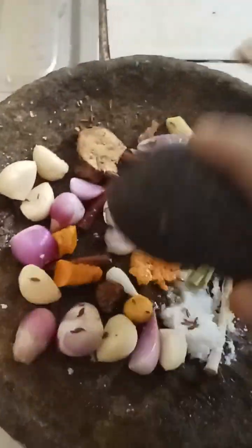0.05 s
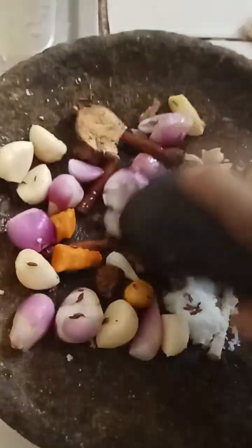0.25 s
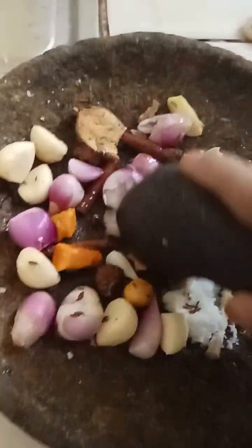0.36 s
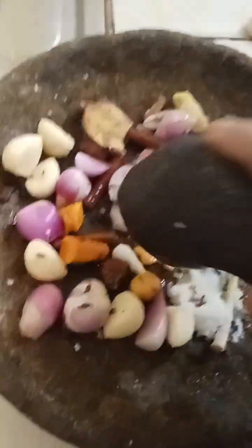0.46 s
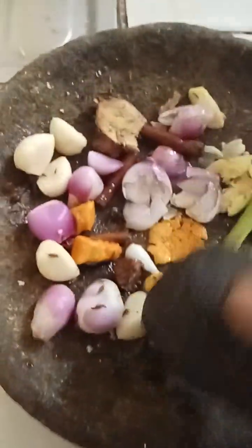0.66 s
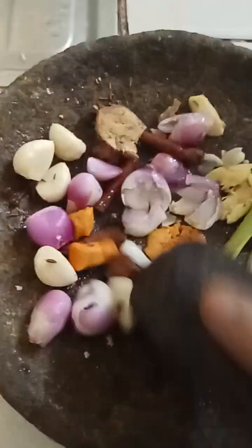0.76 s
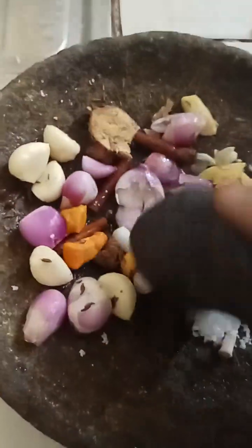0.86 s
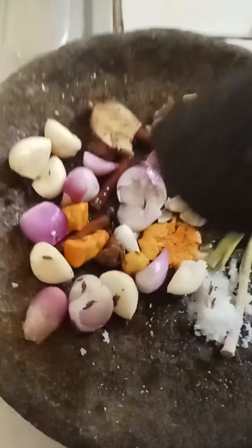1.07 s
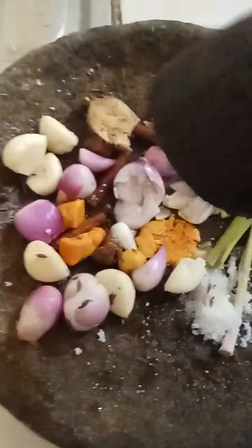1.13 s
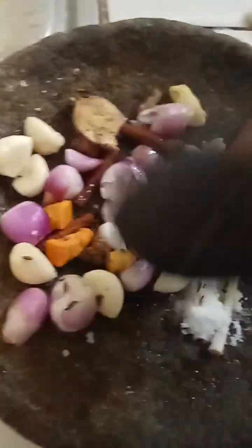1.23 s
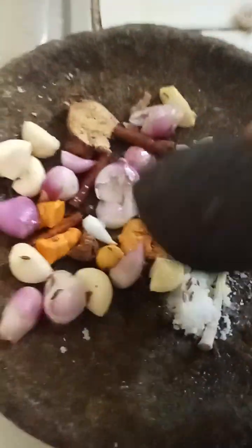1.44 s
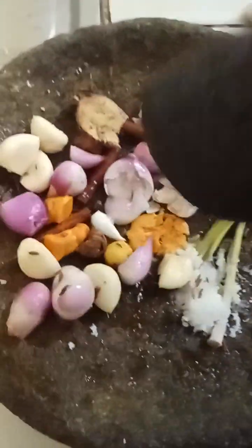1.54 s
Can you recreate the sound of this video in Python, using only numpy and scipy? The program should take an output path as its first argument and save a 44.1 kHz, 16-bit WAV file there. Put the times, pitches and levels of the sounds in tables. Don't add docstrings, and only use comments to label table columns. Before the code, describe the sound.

Stone pestle thudding in a heavy mortar, splitting shallots and spices with sharp cracks and light bounces

```python
import sys
import numpy as np
from scipy import signal
from scipy.io import wavfile
from scipy.ndimage import uniform_filter1d

SR = 44100
rng = np.random.default_rng(int(sys.argv[2]) if len(sys.argv) > 2 else 0)


def volts_from_db(level):
    exponent = np.asarray(level, float) / 20
    return 10 ** exponent


def to_wav(s):
    ch = np.atleast_2d(s).T
    pcm = np.round(np.clip(ch, -1, 1) * 32767)
    wavfile.write(sys.argv[1], SR, pcm.astype(np.int16))


N = 70560
LEAD_S = 0.4
M = N + round(LEAD_S * SR)

# pitch_hz [Hz], level_db [dB]
SNAP_COLOUR = [(300, -40), (1200, -8.5), (1650, -14.5), (2300, 6), (3700, 1.5), (6000, -9.5), (10000, -12),
               (16000, -11)]


def evened(x):
    return x / np.sqrt(np.mean(x ** 2) + 1e-20)


def read(points, hz):
    point_hz, value = np.transpose(points)
    return np.interp(np.log(hz + 1), np.log(point_hz + 1), value)


def add(mix, start_s, sound):
    part = mix[round((start_s + LEAD_S) * SR):][:len(sound)]
    part += sound[:len(part)]


def colour(x, points, tilt_db=0):
    hz = np.abs(np.fft.fftfreq(8192, 1 / SR))
    tilt = tilt_db * np.log2((hz + 1) / 3000)
    log_gain = np.log(volts_from_db(read(points, hz) + tilt))
    response = np.exp(log_gain - 1j * signal.hilbert(log_gain).imag)
    taps = np.fft.ifft(response).real[:4096] * np.hanning(8192)[4096:]
    return signal.fftconvolve(x, taps)[:len(x)]


def ring(hz, db, t60, t):
    return volts_from_db(db - 60 * t / t60) * np.sin(2 * np.pi * hz * t)


def send(body, t):
    return body * np.exp(-t / 0.012)


def air():
    # pitch_hz [Hz], level_db [dB per Hz]
    air_colour = [(40, -52), (100, -15), (300, -1), (800, -4), (2500, -13), (4500, -21), (9000, -29),
                  (16000, -39)]
    drift = evened(uniform_filter1d(rng.standard_normal(M), 3000))
    return volts_from_db(-60 + 1.4 * drift) * evened(colour(rng.standard_normal(M), air_colour))


def blows():
    # start_s [s], ring_db [dB], thump_db [dB], sway_db [dB]
    blow_list = [
        (-.17, -3.5, -23, -32.5),
        (0.2221, -3.5, -12, -35.5),
        (0.653, -50.5, -39, -65.5),
        (0.704, -30, -22.5, -67.5),
        (0.774, -21.5, -23.5, -50.5),
        (1.234, -20.5, -15.5, -37.5),
    ]
    # pitch_hz [Hz], level_db [dB], t60_s [s]
    counter_modes = [(163.9, -6.5, 0.45), (219.1, -9.5, 0.5), (227, -5.5, 0.31), (267.7, -3, 0.41),
                     (250, 1.5, 0.035), (350, 0, 0.037), (470.5, -3.5, 0.13), (488, -4, 0.17),
                     (672, -7.5, 0.034), (763, -11.5, 0.095), (922, -3.5, 0.023), (1085.5, -9, 0.059),
                     (1270, -13, 0.12), (2300, -10, .015)]
    thump_hz, thump_sag, thump_t60, thump_rise_s = 95.4, 0.48, 0.08, 0.008
    sway_hz, sway_from_s, sway_for_s, sway_fade_db = 56.7, 0.087, 0.31, -26
    pulp_hz, pulp_db, pulp_t60 = 573, -7.5, 0.032

    out, wet, t = np.zeros(M), np.zeros(M), np.arange(SR) / SR
    body = sum(ring(*mode, t) * (-1) ** k for k, mode in enumerate(counter_modes)) / 3
    bent_t = t * (1 - thump_sag) + thump_sag * 0.034 * (1 - np.exp(-t / 0.023))
    thump_tone = np.sin(2 * np.pi * thump_hz * bent_t) * (1 - np.exp(-t / thump_rise_s))
    u = np.clip((t - sway_from_s) / sway_for_s, 0, 1)
    sway_tone = np.sin(np.pi * u) ** 0.51 * np.sin(2 * np.pi * sway_hz * t)
    for start_s, ring_db, thump_db, sway_db in blow_list:
        counter = volts_from_db(ring_db) * body
        thump = volts_from_db(thump_db - 60 * t / thump_t60) * thump_tone
        sway = volts_from_db(sway_db + sway_fade_db * u) * sway_tone
        pulp = ring(pulp_hz, thump_db + pulp_db, pulp_t60, t)
        add(out, start_s, counter + thump + sway + pulp)
        add(wet, start_s, send(counter, t))
    return out, wet


def kitchen(x):
    # pitch_hz [Hz], t60_s [s]
    kitchen_t60 = [(60, 0.37), (200, 0.67), (500, .55), (1200, 0.36), (3000, 0.43), (8000, 0.27),
                   (16000, 0.21)]
    echoes = np.zeros(SR)
    at = np.arange(200, SR - 20, 20)
    echoes[at + rng.integers(0, 20, len(at))] = rng.choice([-1., 1.], len(at))
    hz, t, bands = signal.stft(echoes, SR, nperseg=512)
    fade = volts_from_db(-60 * t / read(kitchen_t60, hz)[:, None])
    tail = signal.istft(bands * fade, SR, nperseg=512)[1]
    return signal.fftconvolve(x, tail / np.linalg.norm(tail))[:M]


def cracks():
    # start_s [s], length_s [s], level_db [dB], snap_rate [snaps per s], tilt_db [dB per octave]
    crack_list = [(-.12, .002, -1, 9000, 5), (0.2199, 0.0013, -33, 7300, -7.5),
                  (.2222, .003, -14, 12000, -1), (.2252, 0.002, -9.5, 15000, 1.5),
                  (.2285, .02, -53, 9700, 2), (0.244, 0.21, -36, 22000, -3),
                  (0.648, 0.013, -49.5, 31000, 6.5), (0.701, 0.049, -44.5, 6900, 0),
                  (0.742, 0.044, -40.5, 15000, 2.5), (.762, 0.0045, -56, 11000, 4),
                  (.778, 0.03, -35.5, 7000, -1.5), (0.802, 0.047, -51.5, 5600, 0.5),
                  (0.841, 0.0049, -56, 12000, 3.5), (1.229, 0.011, -19, 8950, -9),
                  (1.2339, .0015, -16, 18800, -0.5), (1.235, 0.0026, -21, 21000, 6),
                  (1.241, 0.013, -32, 3900, -8.5), (1.256, 0.0104, -32, 17000, 1),
                  (1.261, 0.069, -36, 7000, -9), (1.3065, 0.0017, -23.5, 2500, -6)]
    snap_size_db, between_snaps, clump_db = 5, 0.3, 2.2
    crack_fade_db, crush_fade_db_per_s = -3.5, -97.5

    out, wet, t = np.zeros(M), np.zeros(M), np.arange(SR // 4) / SR
    click = 1. * (t == 0)
    draw = rng.random(M)
    size = np.minimum(rng.exponential(1, M), 3)
    clumps = volts_from_db(clump_db * evened(uniform_filter1d(rng.standard_normal(M), size=120)))
    push = rng.standard_normal(M) * clumps
    for start_s, length_s, db, rate, tilt_db in crack_list:
        first = round((start_s + LEAD_S) * SR)
        at = slice(first, first + len(t))
        u = np.minimum(t / length_s, 1)
        fade = volts_from_db(crack_fade_db * u + crush_fade_db_per_s * t)
        shape = np.clip(np.minimum(u, 1 - u) / 0.21, 0, 1) * fade
        hits = (draw[at] < rate / SR) * volts_from_db(snap_size_db * size[at])
        snaps = shape * (hits + between_snaps) * push[at] / np.sqrt(rate / SR * 10)
        add(out, start_s, volts_from_db(db) * colour(snaps, SNAP_COLOUR, tilt_db))
        add(wet, start_s, volts_from_db(db) * np.linalg.norm(snaps) * colour(click, SNAP_COLOUR, tilt_db))
    return out, wet


def splits():
    # start_s [s], level_db [dB], tilt_db [dB per octave]
    split_list = [
        (.2226, 8, -2),
        (.2231, 2, -2),
        (1.2338, 8, -2),
        (1.3068, -8, -4),
        (1.249, -10, -4),
    ]
    out, t = np.zeros(M), np.arange(SR // 4) / SR
    for start_s, db, tilt_db in split_list:
        add(out, start_s, -volts_from_db(db) * colour(1. * (t == 0), SNAP_COLOUR, tilt_db))
    return out


def ticks():
    # start_s [s], level_db [dB], t60_s [s]
    tick_list = [
        (.2955, -34.5, 0.015),
        (0.725, -50.5, 0.018),
        (.787, -54, 0.0088),
        (0.843, -57, 0.077),
        (1.2545, -35, 0.02),
        (1.269, -38.5, 0.032),
        (1.303, -50, 0.074),
        (1.364, -50, 0.0058),
        (1.453, -65, 0.019),
    ]
    tick_hz, click_db = 9690, -12
    out, t = np.zeros(M), np.arange(SR // 4) / SR
    rise = 1 - np.exp(-t / 0.00077)
    click = volts_from_db(click_db) * colour(1. * (t == 0), SNAP_COLOUR)
    for start_s, db, t60 in tick_list:
        tone = ring(tick_hz, -1, t60, t) + ring(tick_hz * 1.04, -28, t60 / 2, t)
        add(out, start_s, volts_from_db(db) * (rise * tone + click))
    return out


def knocks():
    # start_s [s], level_db [dB], contact_ms [ms]
    knock_list = [
        (.674, -30, 0.61),
        (.691, -26, 1),
        (0.7049, -12, 0.62),
        (0.7739, -14, 0.55),
        (0.8133, -18.5, 0.94),
        (1.274, -9, 0.48),
        (1.312, -24, 0.48),
        (1.373, -27, 1),
        (1.391, -31.5, 0.74),
    ]
    # pitch_hz [Hz], level_db [dB], t60_s [s]
    mortar_modes = [(262.7, -9, 0.09), (327, -4.5, 0.046), (334.8, 1.5, 0.063), (398.1, 2.5, 0.11),
                    (545.8, -2.5, 0.092), (638.4, -4, 0.1), (750, -14, 0.12), (786, -6.5, 0.12),
                    (993, 8.5, 0.0094), (1117, -3.5, 0.045), (1271.4, -1.5, 0.11), (2262, 4.5, 0.022)]
    spread_db, rise_turns = 3.5, 0.67

    out, wet, t = np.zeros(M), np.zeros(M), np.arange(SR // 2) / SR
    luck = rng.standard_normal((len(knock_list), len(mortar_modes)))
    for (start_s, db, contact_ms), row in zip(knock_list, luck):
        body = np.zeros(len(t))
        for (hz, mode_db, t60), chance in zip(mortar_modes, row):
            rise = 1 - 0.87 * np.exp(-(t * hz / rise_turns) ** 2 * (hz / 500) ** 2)
            body += ring(hz, mode_db + spread_db * chance, t60, t) * rise
        u = t[:200] * 1000 / contact_ms
        push = u * np.exp(-u * 4)
        knock = -volts_from_db(db) / 3 * np.convolve(body, push / push.sum())[:len(t)]
        add(out, start_s, knock)
        add(wet, start_s, uniform_filter1d(send(knock, t), size=13))
    return out, wet


def chirps():
    # start_s [s], length_s [s], pitch_hz [Hz], width_hz [Hz], level_db [dB]
    chirp_list = [
        (0.885, .26, 2950, 142, -58.5),
        (.882, 0.192, 3200, 250, -62.5),
        (.882, 0.234, 3550, 450, -64),
        (0.964, 0.11, 3520, 370.4, -58.5),
        (0.874, 0.288, 4380, 350, -72.5),
        (0.892, 0.26, 1700, 432, -70.5),
        (0.917, 0.18, 2090, 250, -62),
        (0.952, 0.074, 7500, 200, -72),
    ]
    out, t = np.zeros(M), np.arange(SR // 2) / SR
    for start_s, length_s, hz, width_hz, db in chirp_list:
        a, b, c = rng.standard_normal((3, SR // 2))
        r = np.exp(-np.pi * width_hz / SR)
        slow = signal.lfilter([1], [1, -2 * r, r * r], a + 1j * b)
        band = evened((slow * np.exp(2j * np.pi * hz * t)).real)
        throb = volts_from_db(1.5 * evened(uniform_filter1d(c, 600)))
        shape = np.clip(t / 0.0025, 0, 1) * np.clip((length_s - t) / 0.036, 0, 1)
        add(out, start_s, volts_from_db(db) * shape * throb * band)
    return out


def scene():
    blow, blow_wet = blows()
    crack, crack_wet = cracks()
    split = splits()
    knock, knock_wet = knocks()
    direct = air() + blow + crack + split + ticks() + knock + chirps()
    echo = kitchen(volts_from_db(1) * blow_wet)
    echo += kitchen(volts_from_db(-15.5) * (crack_wet + split))
    echo += kitchen(volts_from_db(-2.5) * knock_wet)
    return (direct + echo)[None, M - N:]


def top_cut(x):
    return signal.sosfilt(signal.butter(12, 16520, fs=SR, output="sos"), x)


def record(dry):
    # pitch_hz [Hz], level_db [dB]
    mic_colour = [(30, -15.5), (70, 5), (4300, 6), (7300, -6.5), (9700, 9.5), (12000, 1), (15300, 3.5)]
    squeeze_from_db, squeeze, recover_db_per_s = -2, 0.2, 48
    top_edge = signal.firwin(301, 15800, fs=SR)
    x = signal.oaconvolve(colour(dry[0], mic_colour), top_edge, "same")
    power_db = 10 * np.log10(abs(uniform_filter1d(x ** 2, 200)) + 1e-12)
    fall_db = np.arange(N) * recover_db_per_s / SR
    held_db = np.maximum.accumulate(power_db + fall_db) - fall_db
    over_db = np.maximum(held_db - squeeze_from_db, 0)
    x = x / volts_from_db(squeeze * uniform_filter1d(over_db, 100))
    mix = np.clip(x, -0.98, 0.98)[None]
    return top_cut(mix)


dry = scene()
out = record(dry)
to_wav(out)
```